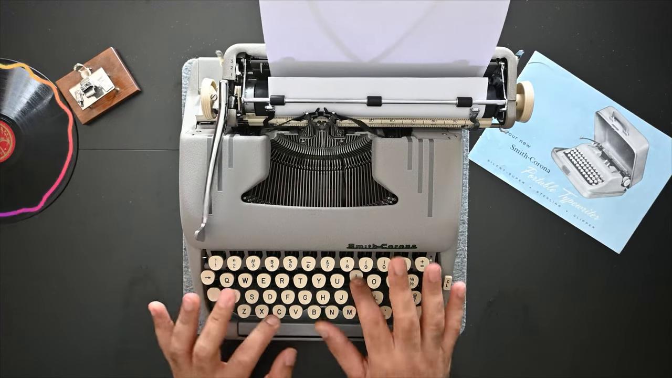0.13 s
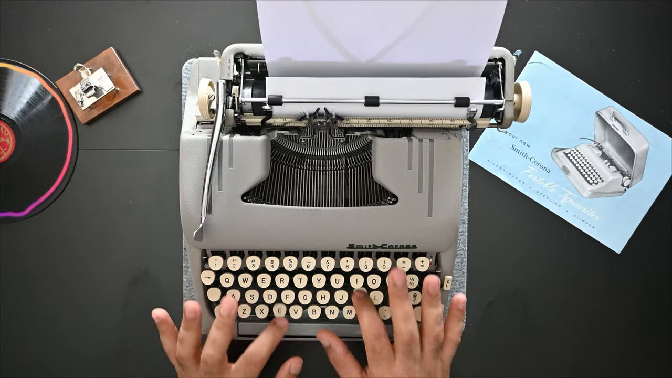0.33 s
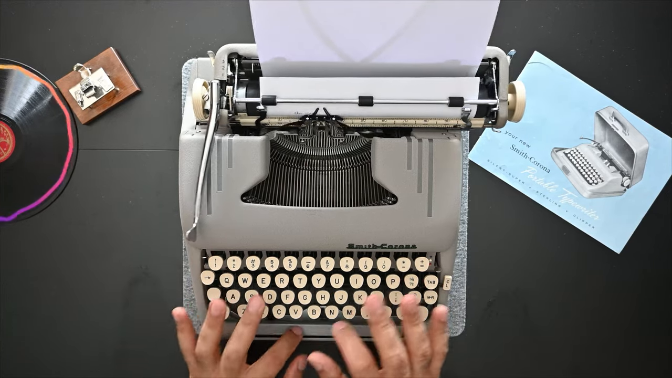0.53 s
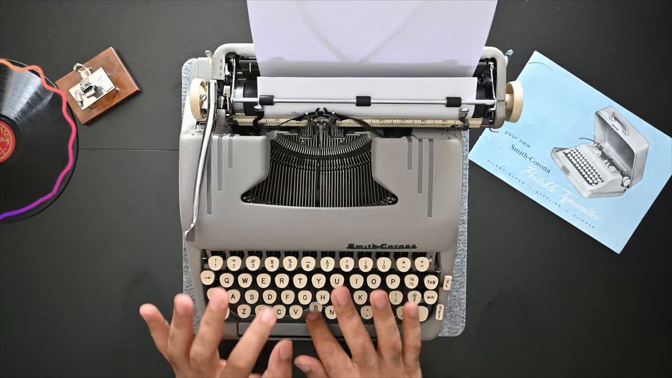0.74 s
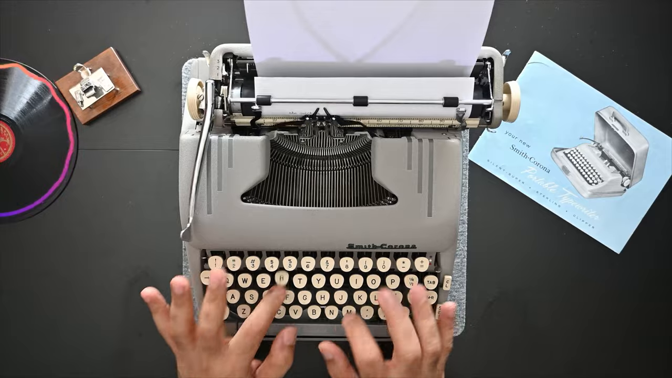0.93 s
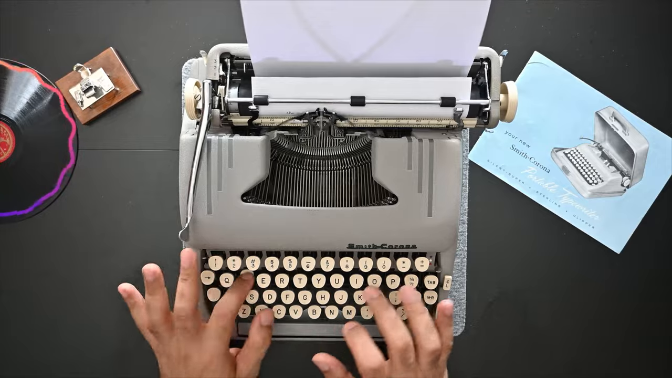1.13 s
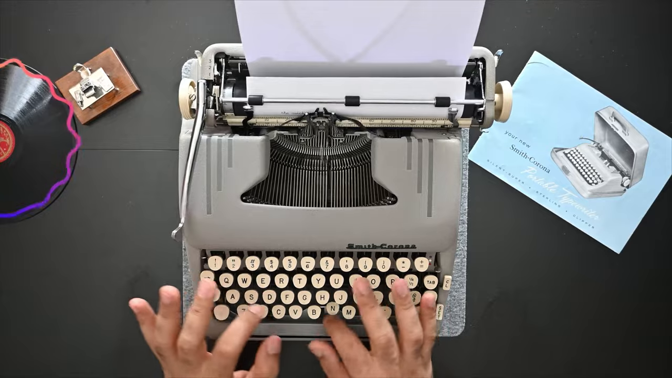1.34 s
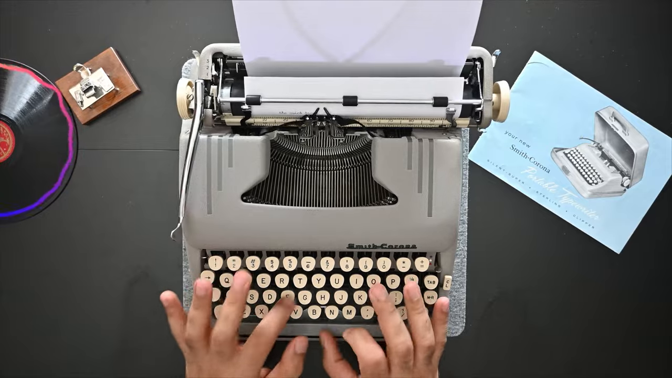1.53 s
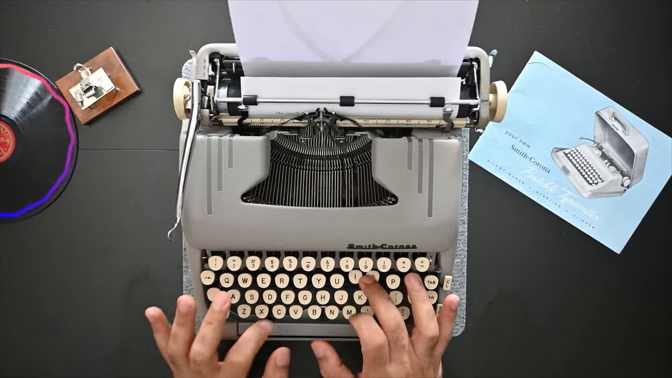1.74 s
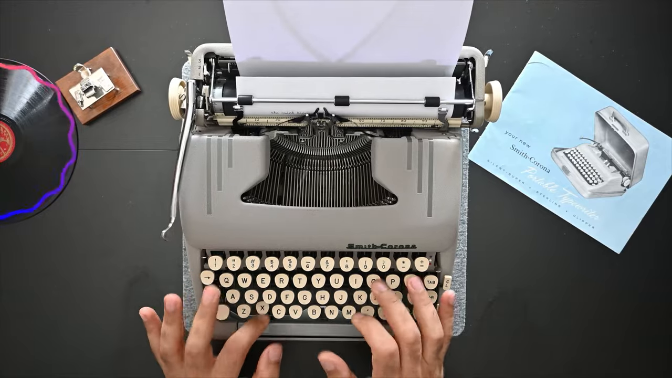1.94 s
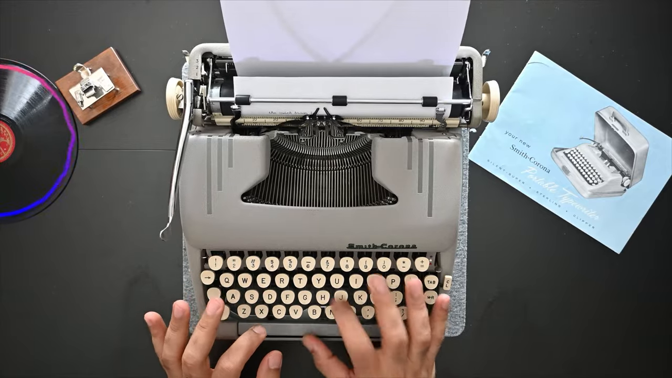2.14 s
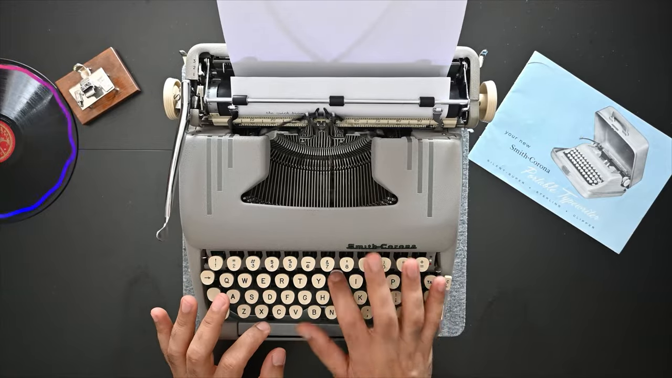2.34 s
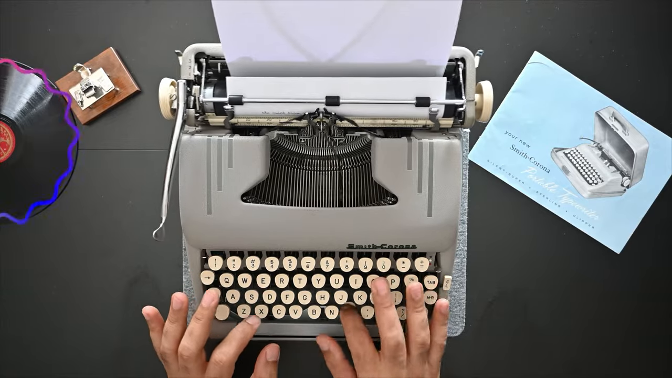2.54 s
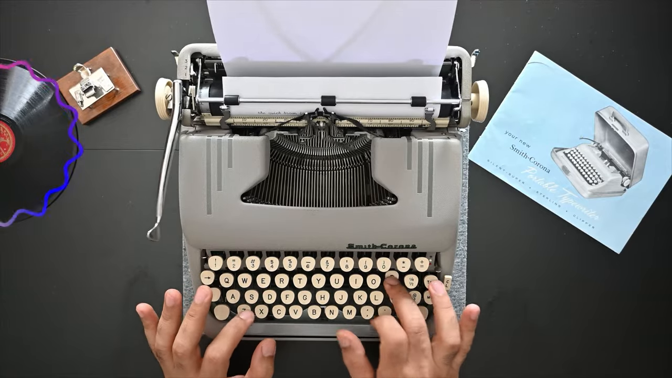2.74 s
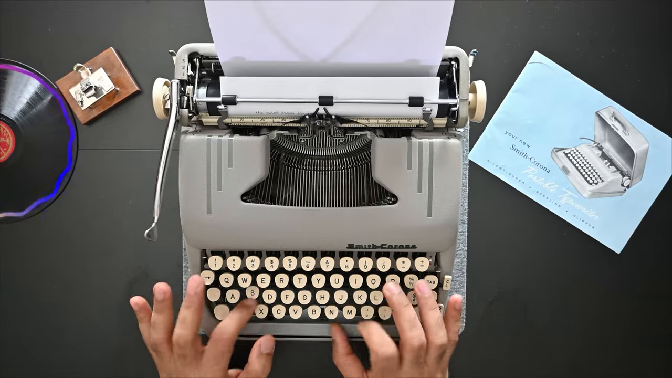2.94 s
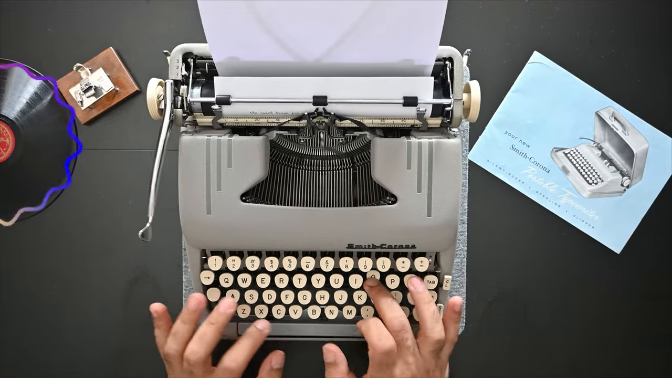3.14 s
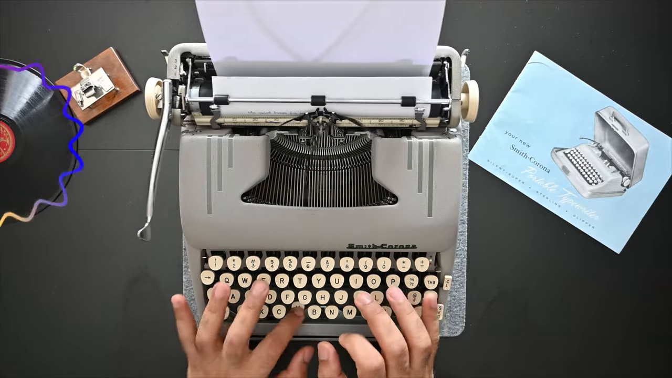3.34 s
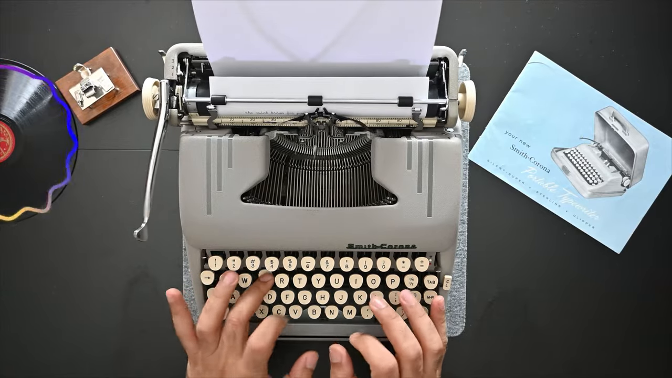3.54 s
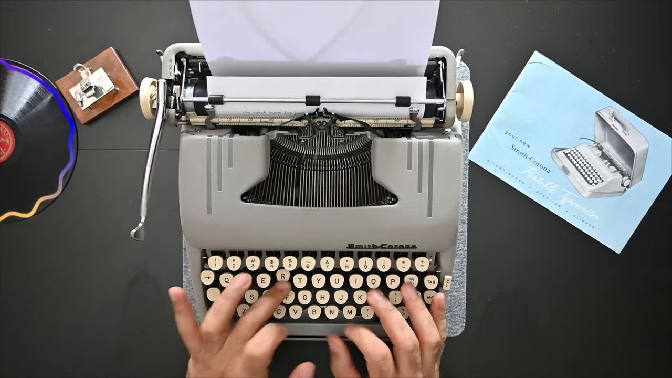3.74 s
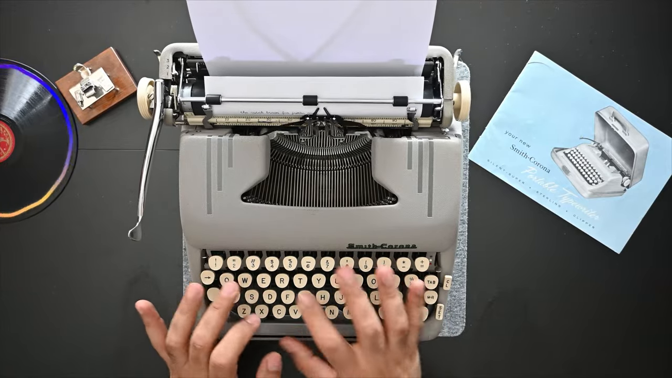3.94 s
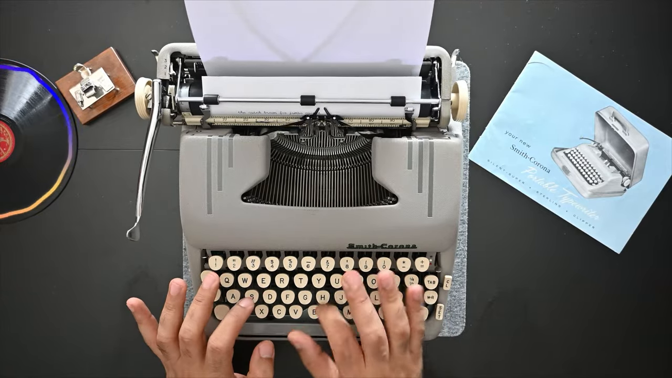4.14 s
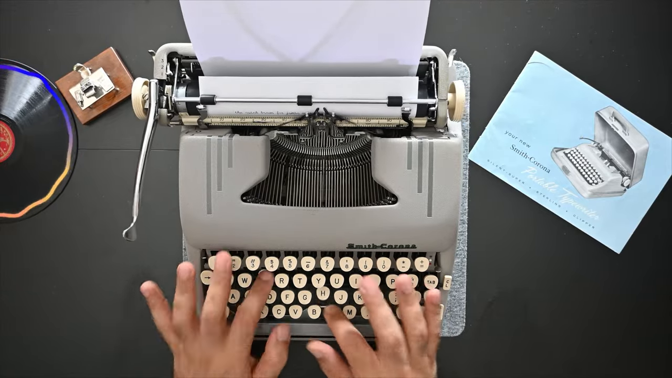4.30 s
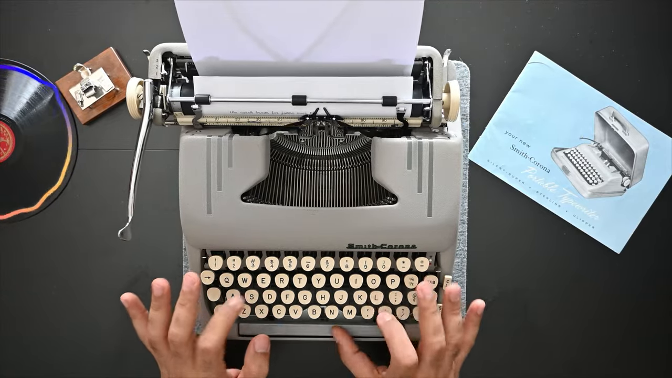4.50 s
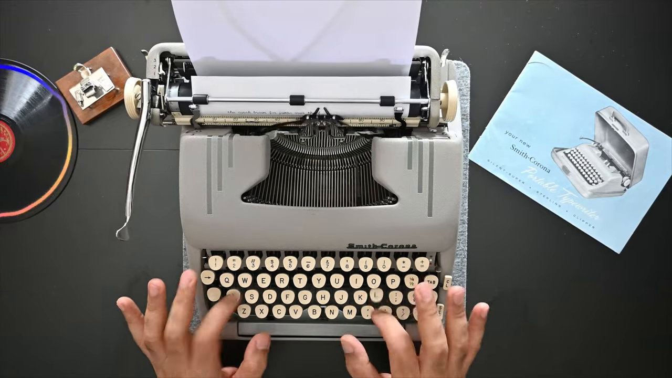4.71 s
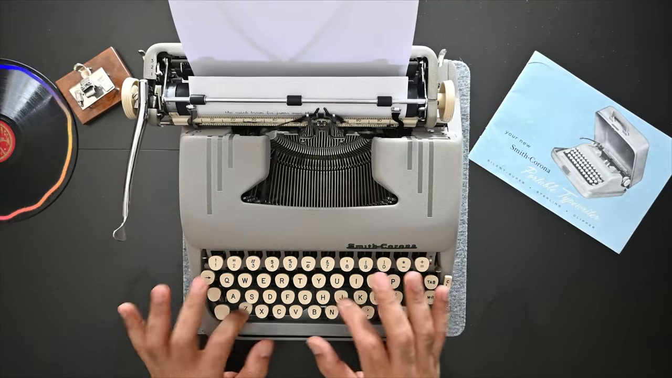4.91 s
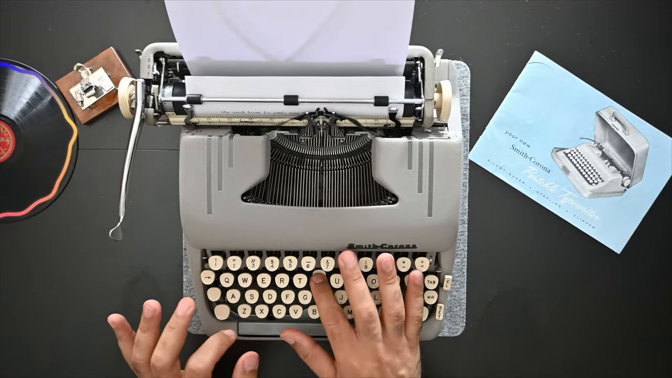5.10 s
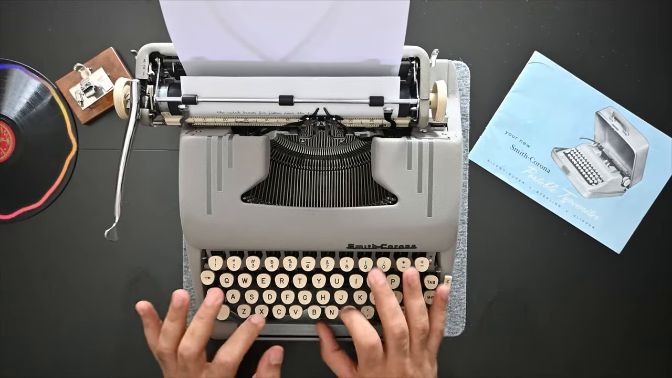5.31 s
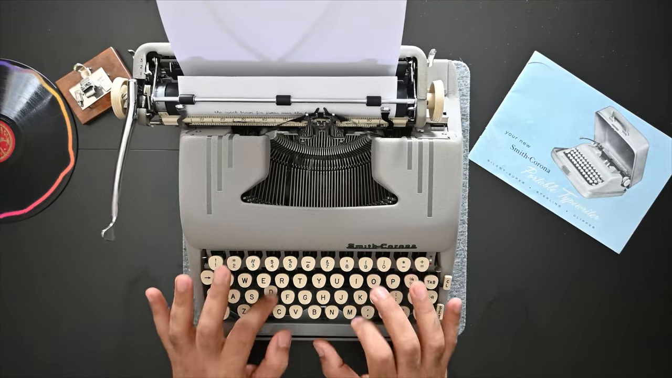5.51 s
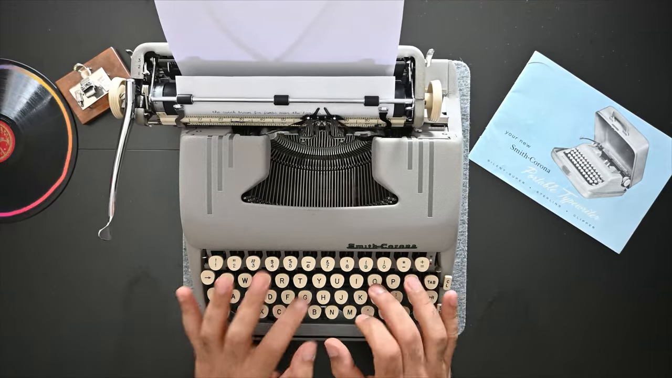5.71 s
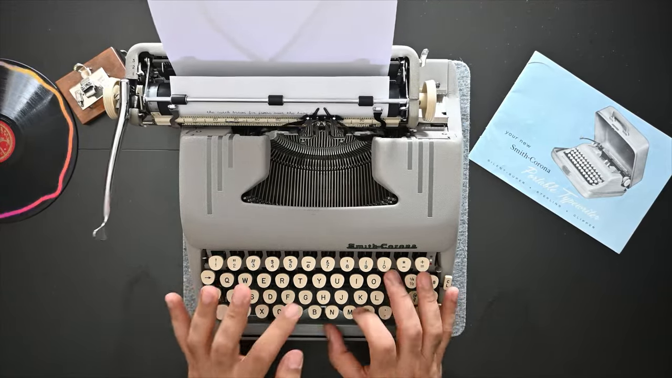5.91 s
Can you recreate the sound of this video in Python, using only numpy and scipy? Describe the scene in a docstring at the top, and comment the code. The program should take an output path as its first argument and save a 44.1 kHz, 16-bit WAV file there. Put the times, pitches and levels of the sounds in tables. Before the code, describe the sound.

Close, quick, even typing on a manual typewriter, sharp metallic cracks with light clatter between, cut off abruptly into faint room air.

```python
"""Typing on a manual typewriter

A manual typewriter is typed on at a quick, even pace, close by on a desk in a quiet room.
Each letter trips the escapement, cracks a type slug against the platen and lets the carriage jump one step.
Key levers, returning type bars and the space bar clatter in between, and the metal frame rings with every blow.
Contacts are short bursts of noise and tones; the ringing is fading noise and a set of decaying tones.
The sound of the typing and its ringing is cut off abruptly; quiet room air and one faint knock follow."""
import sys
import numpy as np
from scipy import signal
from scipy.fft import rfft, irfft, next_fast_len
from scipy.io import wavfile
from scipy.ndimage import uniform_filter1d

SR = 44100
rng = np.random.default_rng(int(sys.argv[2]) if len(sys.argv) > 2 else 0)


def materialize(psi):
    """Save the field psi as 16-bit PCM at rate SR to the path in sys.argv[1].

    A 1-D psi becomes a single channel; in a 2-D psi each row is a channel.
    """
    bounded = np.clip(np.atleast_2d(psi).T, -1, 1)
    quanta = np.round(bounded * 32767).astype(np.int16)
    wavfile.write(sys.argv[1], SR, quanta)


N = 267157
AGE = np.arange(16384) / SR  # seconds since a single sound began

# The typed letters. Each row: strike time in seconds, relative levels in dB of the crack, the escapement
# and the carriage stop, how many seconds earlier the key goes down, relative level in dB of the key tick.
LETTERS = [(0.151, -17.5, -32, -27.5, 0.035, -37.5), (0.3026, -17, -31, -25, .0393, -35),
           (0.4358, -14, -30, -28, 0.027, -36.5), (0.7633, -14.5, -34, -27, 0.043, -33.5),
           (0.922, -17, -28.5, -29, 0.039, -33.5), (1.0779, -16.5, -30, -28, 0.036, -31),
           (1.216, -16, -36, -29, 0.043, -39), (1.355, -14, -30, -25, 0.042, -31.5),
           (1.665, -15.5, -28.5, -28, 0.043, -37.5), (1.8127, -22, -46, -26, 0.045, -34.5),
           (1.9321, -18, -21.5, -31, 0.02, -30.5), (2.2601, -14, -36, -27, 0.04, -34),
           (2.4321, -14, -27, -30, 0.04, -55), (2.6, -13.5, -27, -23.5, 0.035, -40.5),
           (2.7779, -14, -29, -25, 0.038, -45), (2.9236, -16.5, -29, -32, .0417, -36),
           (3.172, -15, -29, -25, 0.037, -38), (3.386, -16.5, -24.5, -32, 0.04, -34),
           (3.572, -14, -30, -30, 0.047, -43), (3.756, -14.5, -28, -30, 0.036, -35),
           (4.0897, -15.5, -26.5, -25.5, .0396, -38.5), (4.2818, -15, -25.5, -27, 0.042, -44),
           (4.4041, -16, -27.5, -31, 0.044, -38), (4.6681, -15.5, -27, -25, 0.037, -34),
           (4.833, -16, -28, -35, 0.04, -30), (5.0137, -15.5, -27, -35, 0.05, -36.5),
           (5.178, -15, -24, -28, 0.038, -34), (5.53, -15.5, -26, -29, 0.036, -35),
           (5.6525, -14.5, -26, -25.5, .0252, -32), (5.836, -15, -24, -28, .0338, -30.5)]
# The typed spaces. Each row: press time in seconds, relative levels in dB of the thumb tick and the
# escapement, seconds until the carriage stops, relative level in dB of that stop, seconds until the bar is back.
SPACE_PRESSES = [(0.56, -34.5, -53, 0.045, -33.5, .0693), (1.4703, -34.5, -44, 0.048, -32, 0.096),
                 (2.054, -37.5, -36.5, 0.057, -32.5, 0.11), (3.0168, -38, -31.5, 0.034, -38.5, 0.085),
                 (3.8476, -38, -32.5, .039, -41, .0865), (4.4986, -39, -37, 0.038, -35.5, 0.095),
                 (5.2996, -32, -44, 0.06, -35, 0.12)]
# Tone colour of the ringing case. Each row: frequency in Hz, relative level in dB.
CASE_COLOUR = [(30, -38), (48, -39), (66, -20), (95, -24), (125, -9.5), (165, -11), (205, -17.5),
               (300, -6.5), (450, 0), (600, 3.5), (820, 0.5), (1050, -15.5), (1500, -1), (3000, -55)]
# Tone colour of the ringing metalwork. Each row: frequency in Hz, relative level in dB.
METAL_COLOUR = [(300, -39), (900, -4), (1200, -0.5), (1500, -0.5), (1750, 0.5), (2100, 0), (2600, 1),
                (3400, -1.5), (4200, -2.5), (6500, -5), (8000, -7.5), (12000, -12), (16000, -40)]
# Tone colour of the ringing springs. Each row: frequency in Hz, relative level in dB.
SPRING_COLOUR = [(1000, -25), (3000, -15), (5000, 3), (6700, 0), (8500, 4), (11500, 2), (16000, 2)]


def amp(db):
    """Turns decibels into gain."""
    return 10 ** (np.asarray(db) / 20)


def read(points, hz):
    """Reads a table joined by straight lines on a log-frequency axis."""
    f, value = np.transpose(points)
    return np.interp(np.log(hz + 1), np.log(f + 1), value)


def evened(x, span):
    """Scales each row to rms 1 over its first span seconds."""
    start = x[..., :max(8, int(span * SR))]
    return x / np.sqrt(np.mean(start ** 2, -1, keepdims=True) + 1e-20)


def place(times, sounds):
    """Lays one sound down at each time."""
    mix = np.zeros(N)
    for s, sound in zip(times, sounds):
        part = mix[max(0, round(s * SR)):][:len(sound)]
        part += sound[:len(part)]
    return mix


def noise(colour, count, size):
    """Makes rows of coloured noise of rms 1."""
    gain = amp(read(colour, np.fft.rfftfreq(size, 1 / SR)))
    white = rng.standard_normal((count, size))
    return irfft(rfft(white) * gain / np.sqrt(np.mean(gain ** 2)), size)


def causal(gain):
    """Finds the spectrum of the most compact causal pulse with this magnitude."""
    log_gain = np.log(np.maximum(gain, 1e-5))
    circle = np.concatenate([log_gain, log_gain[..., -2:0:-1]], -1)
    return np.exp(np.conj(signal.hilbert(circle))[..., :gain.shape[-1]])


def room_air():
    """The still air of the room is a faint, steady, mostly low noise."""
    # Tone colour of the room air. Each row: frequency in Hz, relative level in dB.
    air_colour = [(20, -28), (65, 4), (130, -1), (300, -4), (1000, -15), (4000, -19.5), (16000, -21)]
    return amp(-64.5) * noise(air_colour, 1, next_fast_len(N))[0, :N]


def ticks(times, db, bright_db, rise, decay, size=1536):
    """Steel meets steel: a few milliseconds of chatter, a little different in colour each time."""
    # Tone colour of a tick. Each row: frequency in Hz, relative level in dB.
    tick_colour = [(200, -27), (1000, -15), (2200, -5), (3500, -0.5), (5000, 0.5), (6600, 4), (8000, -2),
                   (10000, -0.5), (12000, 1.5), (16000, -3)]
    patchy_db = 2.7
    t, hz = AGE[:size], np.fft.rfftfreq(size, 1 / SR)
    # random bumps and dips along the spectrum, each about 24 frequency steps wide
    patches = uniform_filter1d(rng.standard_normal((len(times), len(hz))), 24, axis=1) * np.sqrt(24)
    octaves = np.clip(np.log2((hz + 1) / 8000), -1, .5)
    colour_db = np.outer(bright_db, octaves) + patchy_db * patches
    chatter = irfft(rfft(noise(tick_colour, len(times), size)) * amp(colour_db))
    chatter *= (1 - np.exp(-t / rise)) * np.exp(-t / decay)
    return place(times, amp(db)[:, None] * evened(chatter, 0.0039))


def pings(times, db, low_hz, high_hz, t60, count, size=4096):
    """Every lever has a few short modes of its own, somewhere between two pitches."""
    t = AGE[:size]
    pitch, strength, phase = rng.random((len(times), 3, count, 1)).transpose(1, 0, 2, 3)
    hz = low_hz * (high_hz / low_hz) ** pitch
    tone = (strength ** 2 * np.sin(2 * np.pi * (hz * t + phase))).sum(1)
    tone *= (1 - np.exp(-t / 0.00062)) * amp(-60 * t / t60)
    return place(times, amp(db)[:, None] * evened(tone, 0.0039))


def ringing(times, db, colour, rise, damping):
    """Countless small modes store the energy of every blow and give it off, mostly faster at high pitch."""
    # How long the machine rings at damping 1. Each row: frequency in Hz, time to fall by 60 dB in seconds.
    ring_time = [(100, 1), (600, 0.33), (1800, 0.27), (5500, 0.29), (12000, 0.22)]
    size = next_fast_len(N, True)
    hz = np.fft.rfftfreq(size, 1 / SR)
    spectrum = rfft(noise(colour, 1, size)[0])
    energy = np.bincount(np.maximum(times * SR, 0).astype(int), amp(db) ** 2, N)[:N]
    # the energy takes a moment to spread through the machine
    spreading = np.exp(-1 / (rise * SR))
    energy = signal.lfilter([1 - spreading], [1, -spreading], energy + 1e-20)
    centres, t60s = np.transpose(ring_time)
    out = np.zeros(N)
    for band, t60 in zip(np.eye(len(centres)), t60s):
        kept = np.exp(-2 * np.log(1000) * damping / (t60 * SR))  # share of energy kept per sample
        stored = signal.lfilter([1], [1, -kept], energy)
        band_noise = irfft(spectrum * read(np.c_[centres, band], hz), size)[:N]
        out += np.sqrt(stored) * band_noise
    return out


def rattle(times, db, count, within_s, spread_db):
    """Loose links and springs go on clinking faintly for a while after each blow."""
    delay = within_s * rng.uniform(.22, 1, (len(times), count))
    luck_db = spread_db * rng.uniform(-2.8, 1, delay.shape)
    level = (db[:, None] + luck_db - 170 * delay).ravel()  # later clinks are weaker
    when = (times[:, None] + delay).ravel()
    return ticks(when, level, -5 + 3 * rng.standard_normal(len(when)), rise=0.00014, decay=0.0024)


def frame(times, knock_db, ring_db, spread_db):
    """The strong modes: low ones belong to the case, high ones to the metalwork; each blow meets them differently."""
    # Modes of the case and metalwork. Each row: frequency in Hz, relative level in dB,
    # time to fall by 60 dB in seconds.
    mode_table = [(64.2, -19, 0.95), (135, -18.5, 0.76), (155.6, -18, 0.68), (291.6, -10.5, 0.55),
                  (351.6, -7.5, 0.3), (435, -2.5, 0.29), (553, -2, 0.36), (582.3, 0, 0.26),
                  (637.2, 3.5, 0.22), (753, -9, 0.3), (843, -7, 0.31), (958, -6.5, 0.41),
                  (1170, -2.5, 0.22), (1393, -8, 0.17), (1560, -29, 0.14), (1940, -2.5, 0.26),
                  (1990, -6, 0.28), (2097, 6, 0.16), (2166, -1, 0.21), (2390, -0.5, 0.15),
                  (2760, -13, 0.098), (2760, -6, 0.21), (3014, -6.5, 0.28), (3550, -4, 0.16),
                  (5000, -5.5, 0.11), (6940, -3, 0.13)]
    hz, db, t60 = np.transpose(mode_table)
    fading = amp(db[:, None] - 60 * AGE / t60[:, None])
    modes = np.exp(2j * np.pi * np.outer(hz, AGE)) * fading
    drive_db = np.where(hz < 1100, knock_db[:, None], ring_db[:, None])
    drive = amp(drive_db + spread_db * rng.standard_normal(drive_db.shape))
    phase = np.exp(2j * np.pi * rng.random(drive.shape))
    tones = ((drive * phase) @ modes).real
    return place(times, tones * (1 - np.exp(-AGE / 0.00086)))


def stray_clicks():
    """Fingers brush other keys and levers knock together, ringing the metalwork in step with their knock; the
    first row, at the very start, is the machine still ringing from an earlier blow."""
    # The stray clicks. Each row: time in seconds, relative tick level in dB,
    # relative brightness in dB per octave, relative level in dB of the low knock of the case.
    clicks = [(0.001, -46, -6, -42.5), (0.0595, -34, 0.5, -44.5), (0.2827, -28, 9, -39),
              (1.0192, -36.5, 3, -44), (1.1887, -34, -4, -45), (1.204, -29, -12, -40.5),
              (1.8016, -36, 16, -50), (1.8212, -22, 10, -48), (2.362, -35, -2, -42.5),
              (2.5447, -32.5, 1, -44), (2.7175, -36, -3, -41.5), (2.896, -32, -5, -47),
              (2.9091, -36, 6, -44), (3.3021, -29.5, 11, -45), (3.4992, -36.5, -4, -47),
              (3.697, -36.5, -6, -51), (3.86, -34.5, -9, -38.5), (4.202, -30.5, 4, -46.5),
              (4.384, -33.5, -1, -46), (4.4452, -37, -4, -43), (4.51, -34, -6, -43), (4.9973, -37, -7, -51),
              (5.1215, -36, -6, -48), (5.7747, -37, -7, -49), (5.942, -32.5, -4.5, -37.5)]
    rows = np.array(clicks)
    return np.c_[rows, rows[:, -1] - 4.5]  # the last column added is the ring


def contacts(kind, times, tick_db):
    """Lists time, tick, brightness, knock and ring of one kind of contact: the harder, the more it shakes."""
    # What each kind of contact sounds like. Each entry: relative brightness in dB per octave,
    # relative level in dB of the low knock of the case, relative level in dB of the ring of the metalwork.
    contact_table = {"key": (-3.5, -45.5, -46), "linkage": (6, -52.5, -57.5),
                     "bar return": (-3, -44, -45.5), "space press": (-1, -41.5, -46),
                     "space trip": (4, -45, -50.5), "space stop": (-7, -41.5, -43.5),
                     "space return": (-9, -42.5, -43)}
    bright_db, knock_db, ring_db = contact_table[kind]
    # dB of extra knock and ring: 0.36 for each dB that a contact is harder than usual
    harder = 0.36 * (tick_db - np.mean(tick_db))
    return np.c_[times, tick_db, np.full(len(times), bright_db), knock_db + harder, ring_db + harder]


def key_action(spread_db=2):
    """For every letter the key goes down, its linkage takes up slack, and afterwards the type bar drops back."""
    s, *_, lead, key_db = np.transpose(LETTERS)
    slack = rng.uniform(.25, .7, len(s))  # share of the key's travel
    late, slack_luck, return_luck = rng.standard_normal((len(s), 3)).T
    slack_db = key_db - 5.5 + spread_db * slack_luck
    return_s = s + 0.049 + .003 * late
    return_db = -41 + spread_db * return_luck
    return np.vstack([contacts("key", s - lead, key_db),
                      contacts("linkage", s - lead * (1 - slack), slack_db),
                      contacts("bar return", return_s, return_db)])


def keywork():
    """Levers tick and knock as keys go down, type bars drop back and the space bar is thumbed."""
    rows = np.vstack([key_action(), space_action(), stray_clicks()])
    s, tick_db, bright_db, knock_db, ring_db = rows.T
    # a bright contact snaps shut sooner than a dull one
    chatter_s = 0.0053 / (1 + amp(2.6 * (bright_db[:, None] - 10)))
    out = ticks(s + .0003, tick_db + 0.33, bright_db + 2.7, rise=0.00035, decay=chatter_s)
    # thin steel links, then key levers
    out += pings(s + .0005, tick_db - 5.5, low_hz=4386, high_hz=12660, t60=0.041, count=6)
    out += pings(s + 0.001013, ring_db + 0.5, low_hz=736, high_hz=2294, t60=0.033, count=12)
    out += ringing(s, knock_db - .4, CASE_COLOUR, rise=0.00085, damping=1.36)
    out += ringing(s, ring_db - .1, METAL_COLOUR, rise=0.00029, damping=1.08)
    out += ringing(s, tick_db - 12.5, SPRING_COLOUR, rise=0.0015, damping=1.04)
    out += rattle(s, tick_db - 7.5, count=2, within_s=.026, spread_db=3)
    return out + frame(s, knock_db - 8.5, ring_db - 24, spread_db=4.0)


def desk_push(times):
    """Each blow pushes the machine into the desk: one soft, very low pulse around each strike."""
    lead_s, half_width_s, level_db = .013, 0.0041, -51
    u = (AGE - lead_s) / half_width_s
    pulse = (2 * u ** 2 - 1) * np.exp(-u ** 2)
    return place(times - lead_s, [amp(level_db) * pulse] * len(times))


def cracks(times, db, sweep_s, vary_db, scatter, slap_db, slap_s, thump_db, size=4096):
    """The slug hits the platen, whose resonances shift as the carriage travels."""
    # Resonances of the struck platen. Each row: frequency in Hz, relative width in Hz,
    # then relative levels in dB at carriage places 0, 1, 2 and 3.
    platen = [(1320, 206, -7.5, -8.5, -9, -2.5), (2040, 333, -5.5, -2, -1.5, -0.5),
              (2424, 192, -39, -7, 1.5, 1), (2930, 390, -4.5, -13.5, -6.5, -1),
              (3490, 450, 5, -18.5, -6, -15), (4200, 890, -6, -17.5, -13.5, -2),
              (5020, 470, -25, -9.5, -5, -5.5), (5790, 630, -21, -9, -8, -3.5),
              (6650, 820, -11.5, -5, -11.5, -3), (8240, 820, -10.5, -14, -11, -6),
              (9440, 840, -6, -16.5, -9.5, -5.5), (13230, 2100, -10, -10, -8.5, -6.5)]
    # Travel of the carriage. Each row: time in seconds, place along the line from 0 (start) to 3 (end).
    carriage = [(1.3, 0.43), (2.3, 0.95), (2.9, 1.7), (4.2, 1.77), (5.4, 2.93)]
    # Tone colour of the slap of ribbon and paper. Each row: frequency in Hz, relative level in dB.
    slap_colour = [(100, -39), (1000, 3.5), (2500, -40), (5500, 5), (8500, 3.5), (11000, -1), (13500, 5),
                   (16000, -1)]
    # Tone colour of the machine's thump. Each row: frequency in Hz, relative level in dB.
    thump_colour = [(20, -43), (45, -25), (120, -15), (230, -6), (380, -1), (580, -16), (730, 6),
                    (880, 3.5), (1050, -20), (1500, 7.5), (4000, -54)]
    t, f = AGE[:size], np.fft.rfftfreq(size, 1 / SR)
    hz, width, *levels = np.transpose(platen)
    # blend the levels of the two nearest carriage places
    along = np.interp(times, *np.transpose(carriage))
    weights = np.maximum(1 - abs(along[:, None] - np.arange(len(levels))), 0)
    mode_db = weights @ np.array(levels) + vary_db * rng.standard_normal((len(times), len(hz)))
    mode_db -= 7.4 * hz / hz.max()  # the ribbon cushions the highest resonances
    bumps = 1 / (1 + (2 * (f - hz[:, None]) / (1.33 * width[:, None])) ** 2) ** 2
    spectrum = causal(np.sqrt(amp(mode_db) ** 2 @ bumps))
    # bending waves carry the treble fastest, so the crack sweeps downward; sweep_s is the delay at 1 kHz
    spectrum *= np.exp(-4j * np.pi * sweep_s * np.sqrt(1000 * f))
    # each type bar chatters in its own way during contact, which smears the treble
    contact = rng.standard_normal((len(times), size)) * np.exp(-(t / 0.0031) ** 2)
    contact /= np.linalg.norm(contact, axis=1, keepdims=True)
    smear = np.clip(scatter * np.sqrt(f / 8000), 0, .9)
    smeared = spectrum * (np.sqrt(1 - smear ** 2) + smear * rfft(contact))
    crack = evened(irfft(smeared), 0.0039)
    # ribbon and paper slap briefly, and the whole machine takes a push
    slap_shape = (1 - np.exp(-t / 0.0001)) * np.exp(-(t / slap_s) ** 2)
    slap = evened(noise(slap_colour, len(times), size) * slap_shape, 0.0023)
    thump = evened(irfft(causal(amp(read(thump_colour, f)))), 0.002)
    blow = (crack + amp(slap_db) * slap) * np.exp(-(t / 0.017) ** 2)
    blows = place(times, amp(db)[:, None] * blow)
    return blows + place(times + 0.0019, amp(db + thump_db)[:, None] * thump)


def letters():
    """Escapement, crack, carriage stop and type bar rebound, each letter leaving the machine ringing."""
    s, crack_db, trip_db, stop_db, *_ = np.transpose(LETTERS)
    each = np.ones(len(s))
    # the escapement trips just before the strike time, and the carriage stops just after it
    trip, stop = s - .0076, s + .0126
    rebound = s + .0326 + .0012 * rng.standard_normal(len(s))
    ring_db = -34.5 + 0.52 * (crack_db - crack_db.mean())  # the ring grows with the crack
    out = amp(0.55) * cracks(s - .0007, crack_db, sweep_s=.0023, vary_db=1.34, scatter=0.72,
                             slap_db=-10.0, slap_s=0.0046, thump_db=-21.0)
    out += ticks(trip, trip_db + .5, 2.0 * each, rise=0.001, decay=0.0051)
    # the type bar shudders as it falls away
    out += pings(s + 0.0075, stop_db - 16.5, low_hz=1856, high_hz=7440, t60=0.026, count=9)
    out += ticks(stop, stop_db, .3 * each, rise=0.00056, decay=0.002)
    out += ticks(rebound, -32.5 * each, -3 * each, rise=0.00052, decay=0.0026)
    out += ringing(trip, -36.5 * each, CASE_COLOUR, rise=0.0058, damping=0.91)
    out += ringing(trip, trip_db - 7.0, METAL_COLOUR, rise=0.0061, damping=1.33)
    out += ringing(s + 0.00092, ring_db + 4.0, METAL_COLOUR, rise=0.0074, damping=1.2)
    out += ringing(stop, stop_db - 20.0, SPRING_COLOUR, rise=.002, damping=0.76)
    out += rattle(s, ring_db + 1.5, count=5, within_s=.085, spread_db=8)
    return out + frame(s, -42.5 * each, ring_db - 3.0, spread_db=2.0) + desk_push(s)


def space_action(trip_s=.022, return_db=-40):
    """The thumb hits the bar, the escapement trips, the carriage steps and stops, and the bar springs back."""
    s, press_db, trip_db, stop, stop_db, back = np.transpose(SPACE_PRESSES)
    return np.vstack([contacts("space press", s, press_db),
                      contacts("space trip", s + trip_s, trip_db),
                      contacts("space stop", s + stop, stop_db),
                      contacts("space return", s + back, np.full(len(s), return_db))])


def space_clatter(db=-43, within_s=.075, spread_db=3, count=4):
    """The long space bar and its rods clack loosely while the carriage steps."""
    s = np.array(SPACE_PRESSES)[:, 0]
    when, luck = rng.random((len(s), 2, count)).transpose(1, 0, 2)
    times = (s[:, None] + within_s * (np.arange(count) + when) / count).ravel()
    level = db + spread_db * (2 * luck.ravel() - 1)
    return pings(times, level, low_hz=720, high_hz=1850, t60=0.031, count=10)


def faint_knock():
    """One soft knock after the typing: a short ring in the colour of the case and a dull tick."""
    when = np.array([6.029])
    ring = ringing(when, [-53], CASE_COLOUR, rise=0.0019, damping=4.2)
    return ring + ticks(when, [-54], [-6], rise=.0005, decay=0.0022)


def scene():
    """The sound of the typing and its ringing is cut off abruptly; room air and one faint knock follow."""
    cut_s, fade_s = 5.977, .001
    sounding = np.clip((cut_s - np.arange(N) / SR) / fade_s, 0, 1)
    typing = letters() + keywork() + space_clatter()
    return (typing * sounding + room_air() + faint_knock())[None]


def record(dry, ceiling=0.56):
    """The loudest cracks are rounded off; then a low-pass filter removes the very highest treble."""
    edge_hz = 16050
    rounded = dry / np.sqrt(np.hypot(1, (dry / ceiling) ** 2))
    low_pass = signal.firwin(301, edge_hz, window=("kaiser", 8), fs=SR)
    return signal.oaconvolve(rounded, low_pass[None], "same")


dry = scene()
out = record(dry)
materialize(out)
```